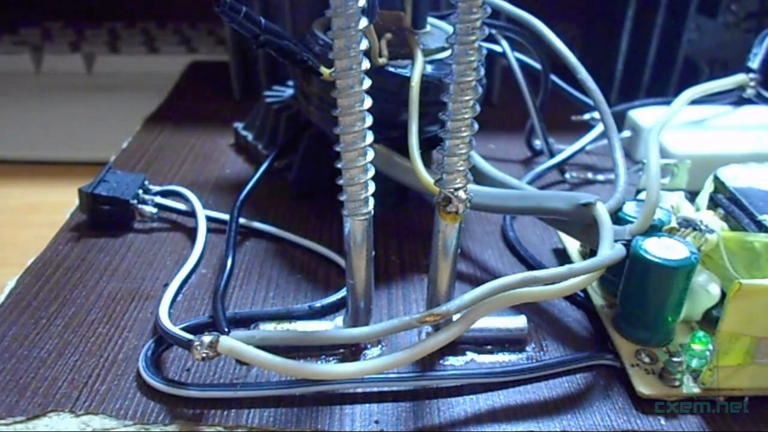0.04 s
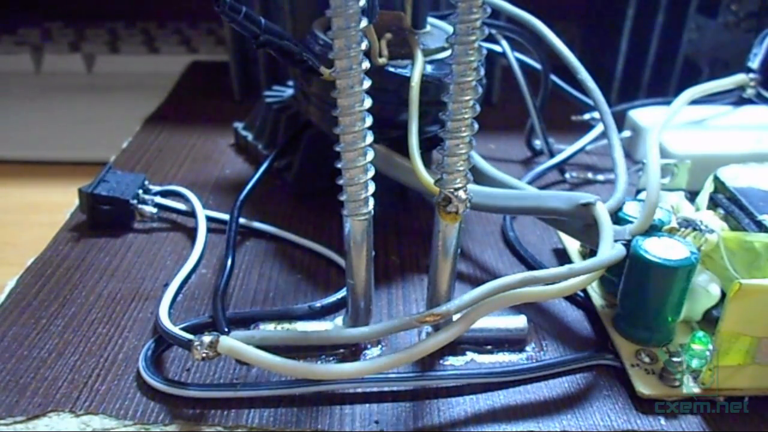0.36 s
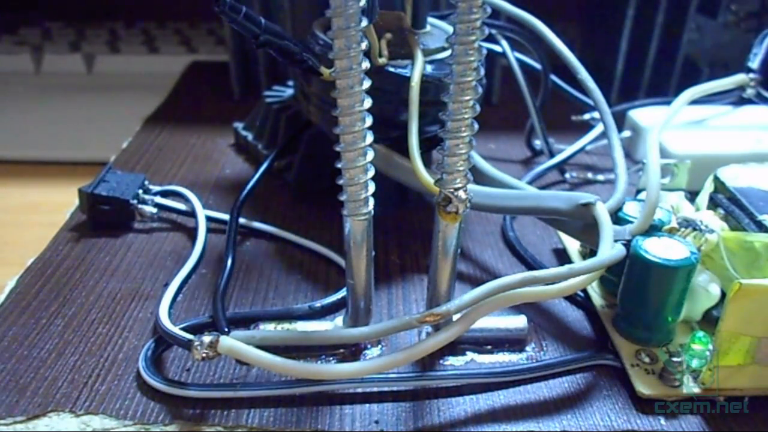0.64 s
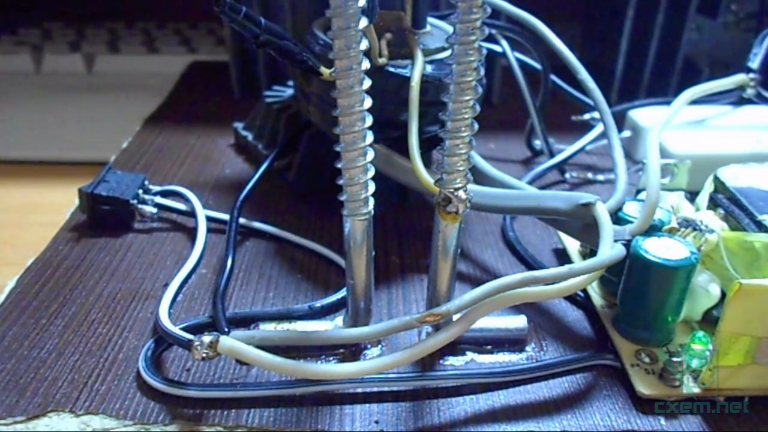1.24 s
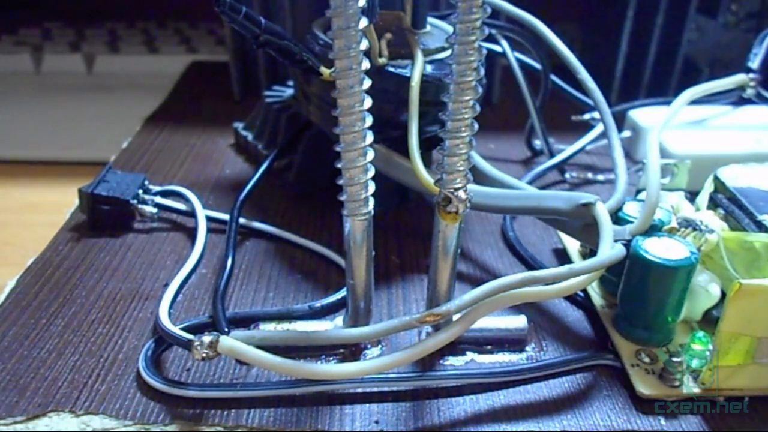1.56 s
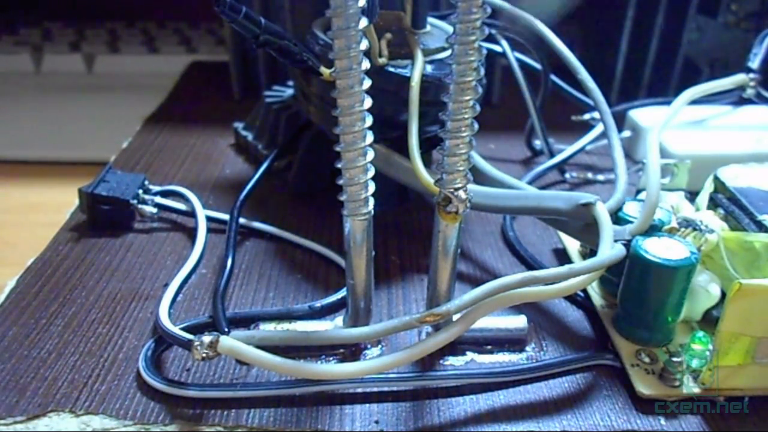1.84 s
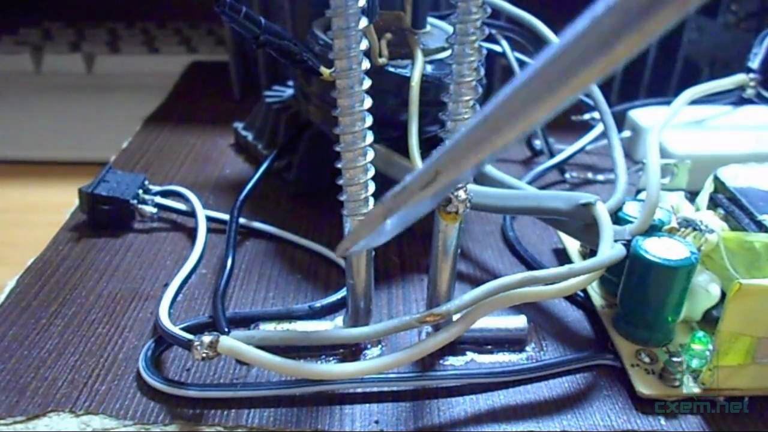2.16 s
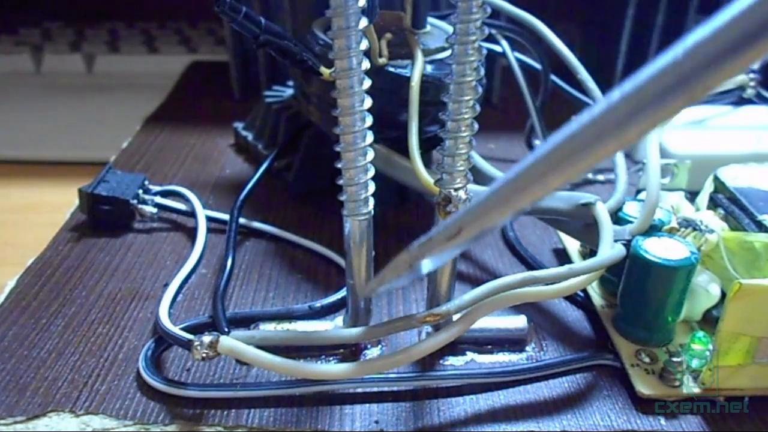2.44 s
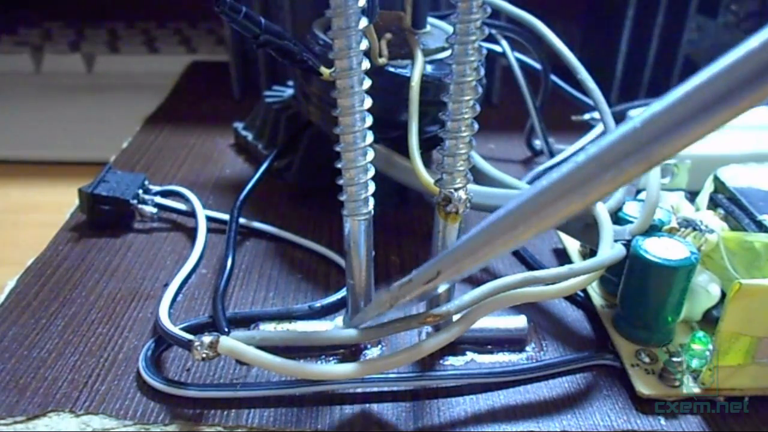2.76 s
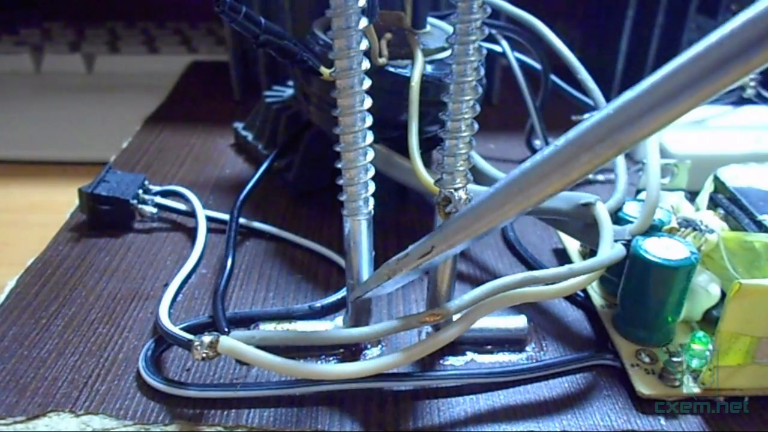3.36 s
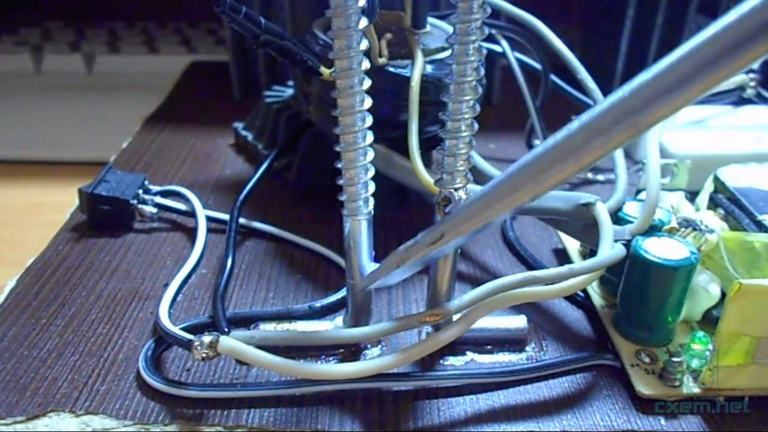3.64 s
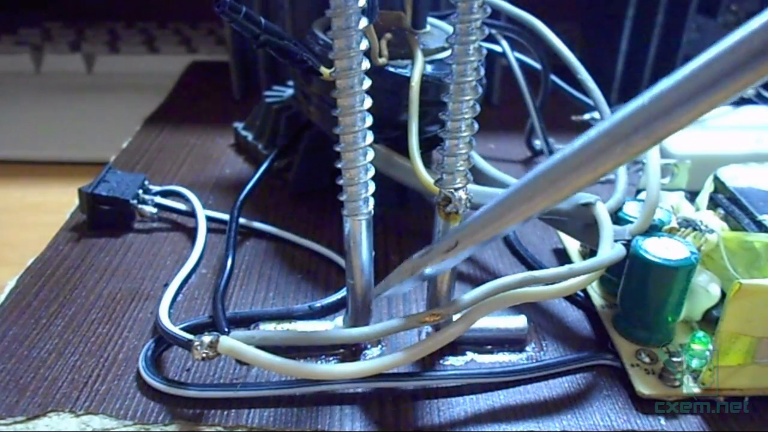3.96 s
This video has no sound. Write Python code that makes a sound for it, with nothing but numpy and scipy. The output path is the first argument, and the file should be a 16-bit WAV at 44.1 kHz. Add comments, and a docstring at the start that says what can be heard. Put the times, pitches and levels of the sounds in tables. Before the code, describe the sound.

A very high, unsteady electronic whine sounds close up in a small room, then cuts off. The rush and hum of fans grow louder behind it, dipping suddenly near the end under light metal clicks and dull table knocks.

```python
"""A homemade high-voltage circuit on a table whines near 10 kHz: one steady tone and a lower,
unstable oscillation that keeps slipping into chirps. At 0.73 s the whine stops with a tick and a tiny
squeak. The steady hiss and blade hum of cooling fans grow louder as the recorder's gain recovers, and
are ducked abruptly at 3.27 s. A screwdriver at the electrodes makes a few clicks, dull bumps excite
the modes of the table, and the gain on the fan noise partly comes back."""
import sys
import numpy as np
from scipy import signal
from scipy.fft import rfft, irfft
from scipy.io import wavfile

SR = 44100
rng = np.random.default_rng(int(sys.argv[2]) if len(sys.argv) > 2 else 0)


def int16_out(signal):
    """Quantize to a 16-bit WAV file."""
    q = np.round(np.clip(np.atleast_2d(signal).T, -1, 1) * 32767)
    wavfile.write(sys.argv[1], SR, q.astype(np.int16))


N = 176400
TIME = np.arange(N) / SR
CUTOFF_HZ = 11000


def from_db(db):
    """Amplitude ratio of a level in decibels."""
    return 10 ** (np.asarray(db) / 20)


def unit_rms(x):
    """Normalisation to a root mean square of 1."""
    return x / np.sqrt(np.mean(x ** 2) + 1e-20)


def curve(rows):
    """Linear interpolation of (time, value) points at every sample."""
    time_s, values = np.transpose(rows)
    return np.interp(TIME, time_s, values)


def drift(rate_hz):
    """Low-pass filtered noise: a random modulation of rms 1."""
    step, settle = 40, 2000  # audio samples per point; points dropped while the filter settles
    pole = np.exp(-2 * np.pi * rate_hz * step / SR)
    white = rng.standard_normal(N // step + settle + 2)
    slow = signal.lfilter([1], [1, -2 * pole, pole * pole], white)[settle:]
    return np.interp(np.arange(N) / step, np.arange(len(slow)), unit_rms(slow))


def noise(spectrum):
    """Spectral shaping: white noise takes on a colour, at rms 1."""
    hz, db = np.transpose(spectrum)
    bin_hz = np.maximum(np.arange(N // 2 + 1) * SR / N, 1)
    gain = from_db(np.interp(np.log(bin_hz), np.log(hz), db))
    return unit_rms(irfft(rfft(rng.standard_normal(N)) * gain, N))


def tone(hz):
    """Phase is the integral of frequency: a sine of rms 1 follows a pitch curve."""
    return np.sqrt(2) * np.sin(2 * np.pi * (np.cumsum(hz) / SR + rng.random()))


def resonate(x, hz, width_hz):
    """Forced response of a second-order resonator with a peak gain of 1."""
    radius = np.exp(-np.pi * width_hz / SR)
    feedback = [1, -2 * radius * np.cos(2 * np.pi * hz / SR), radius ** 2]
    return signal.lfilter(np.array([1, 0, -1]) * (1 - radius ** 2) / 2, feedback, x)


def ring(impulses, hz, t60_s):
    """Free vibration of a mode: each impulse starts a damped sine of its own height."""
    radius, angle = from_db(-60 / (t60_s * SR)), 2 * np.pi * hz / SR
    feedback = [1, -2 * radius * np.cos(angle), radius ** 2]
    return signal.lfilter([0, np.sin(angle)], feedback, impulses + 1e-18)


def gate(start_s, length_s, attack_s, release_s):
    """Envelope with a linear attack and, after length_s, an exponential decay."""
    age = TIME - start_s
    return np.clip(age / attack_s, 0, 1) * np.exp(-np.clip((age - length_s) / release_s, 0, 60))


def room(x, t60_s=0.32, gain_db=-18):
    """Reverberation: the diffuse field of a small room decays exponentially."""
    age = TIME[:SR // 2]
    tail = rng.standard_normal(len(age)) * from_db(-60 * age / t60_s)
    return from_db(gain_db) * signal.fftconvolve(x, tail / np.linalg.norm(tail))[:N]


# Spectrum of the rushing air: (frequency_hz, relative_density_db)
AIR_SPECTRUM = [(24, -15), (38, -10.5), (130, -11), (180, -4), (215, 0), (300, 0.5), (410, -5.5),
                (520, -1.5), (800, 0.5), (1020, -2), (1300, -9), (1700, -12), (2000, -16), (2700, -20.5),
                (3500, -22), (5000, -26.5), (6500, -30.5), (7900, -29), (9250, -18.5), (9700, -15),
                (10050, -10), (10400, -15.5), (10700, -25)]
# Harmonics of the blade-passing frequency: (harmonic_number, relative_level_db)
BLADE_HARMONICS = [(1, -34), (2, -34), (3, -42), (6, -53), (12, -60), (14, -58.5), (15, -59)]
# Tones of the other fans: (pitch_hz, relative_level_db, wander_hz)
FAN_TONES = [(306.7, -42, 3.5), (611, -38, 1.8), (771, -48.5, 5.05), (1051, -50, 4.1)]
# Envelope of one fan tone that swells and fades: (time_s, relative_level_db)
SWELL_ENVELOPE = [(0, -47), (.35, -32.5), (.65, -39.5), (1.3, -41.5), (1.8, -36), (2.1, -44.5),
                  (2.75, -43.5), (3, -35.5), (3.25, -42.5)]
# The recorder's gain on the steady fan noise, as a set curve: (time_s, gain_db)
RECORDER_GAIN = [(0, -15.5), (.72, -14.5), (.8, -16.5), (.83, -21.5), (.89, -21), (.93, -15), (1.0, -10.5),
                 (1.03, -14.5), (1.16, -8), (1.35, -3.5), (1.65, -1), (2.3, 0.5), (3.266, .5),
                 (3.268, -12.5), (3.305, -22), (3.37, -19.5), (3.57, -19.5), (3.67, -22.5), (3.7, -14),
                 (3.8, -11.5), (3.951, -5.5), (3.954, -17), (4, -11)]


def fans(blade_hz=274.45, swell_hz=348, flutter_db=1.42):
    """Aerodynamic sound: steady turbulent hiss and blade-passage hum, scaled by the recorder's gain."""
    sound = from_db(-31) * noise(AIR_SPECTRUM)
    blade_phase = 2 * np.pi * np.cumsum(blade_hz * (1 + 0.0006 * drift(2.04))) / SR
    for harmonic, db in BLADE_HARMONICS:
        sound += from_db(db + flutter_db * drift(6.2)) * np.sqrt(2) * np.sin(harmonic * blade_phase)
    for hz, db, wander_hz in FAN_TONES:
        sound += from_db(db + flutter_db * drift(10)) * tone(hz + wander_hz * drift(10.2))
    swell = from_db(curve(SWELL_ENVELOPE) + flutter_db * drift(3.6))
    sound += swell * tone(swell_hz + 2 * drift(11.8))
    return from_db(curve(RECORDER_GAIN)) * sound


# Dull bumps on the table: (start_s, level_db)
BUMPS = [(0.735, -45.5), (3.279, -31), (3.322, -32), (3.498, -39), (3.522, -28.5), (3.536, -32),
         (3.546, -28.5), (3.588, -30), (3.614, -26), (3.642, -32.5)]
# Modes of the table: (pitch_hz, gain_db, t60_s)
TABLE_MODES = [(136, -6, .04), (208, -1, 0.033), (540, -4.5, 0.012)]
# Envelope of the handling rumble: (time_s, level_db)
RUMBLE_ENVELOPE = [(.71, -69), (.74, -50), (.87, -67), (3.25, -57), (3.33, -43.5), (3.37, -56), (3.42, -62),
                   (3.485, -41), (3.56, -42.5), (3.65, -46), (3.7, -69)]
# Spectrum of that rumble: (frequency_hz, relative_density_db)
RUMBLE_SPECTRUM = [(20, -13), (55, -5.5), (200, -14), (400, -23), (1200, -52), (4000, -58)]


def handling():
    """Modal vibration: bumps excite the damped modes of the table, over a low rumble."""
    impulses = np.zeros(N)
    for start_s, db in BUMPS:
        impulses[int(start_s * SR)] = from_db(db)
    thuds = sum(from_db(db) * ring(impulses, hz, t60_s) for hz, db, t60_s in TABLE_MODES)
    return thuds + from_db(curve(RUMBLE_ENVELOPE)) * noise(RUMBLE_SPECTRUM)


# Faint metallic pings at two of the clicks: (start_s, pitch_hz, level_db)
PINGS = [(.732, 2340, -55), (3.32, 4400, -52)]


def pings(decay_s=0.016):
    """Damped vibration: each ping is a single sine that decays exponentially."""
    return sum(from_db(db) * gate(start_s, 0, decay_s / 10, decay_s) * tone(np.full(N, hz))
               for start_s, hz, db in PINGS)


# Ticks as the whine ends, then screwdriver contacts: (start_s, level_db, decay_s, bright_ring_gain_db)
CLICKS = [(0.732, -46, 0.0041, -2), (.916, -55.5, 0.0045, 7.5), (3.2786, -43, .00072, 11),
          (3.319, -42, 0.0054, -9), (3.506, -45, .0007, 4.5), (3.521, -46.5, .0009, 2),
          (3.5367, -50, .0009, 2), (3.565, -49, .0009, 6), (3.587, -51, .0012, 7), (3.611, -54, 0.0026, 11),
          (3.6425, -51.5, .001, 6), (3.691, -33.5, 0.00063, 6)]


def clicks():
    """Transient excitation: broadband cracks carry two resonances; the sliding tip adds friction noise."""
    middle_ring = unit_rms(resonate(rng.standard_normal(N), hz=3390, width_hz=300))
    lowpass = signal.butter(2, CUTOFF_HZ, fs=SR, output="sos")
    crack = unit_rms(signal.sosfilt(lowpass, rng.standard_normal(N))) + from_db(-15.5) * middle_ring
    bright_ring = unit_rms(resonate(rng.standard_normal(N), hz=9900, width_hz=490))
    roughness = from_db(-65 + 9 * np.tanh(drift(150)))
    scratch = roughness * gate(start_s=3.48, length_s=0.2, attack_s=0.014, release_s=0.014) * crack
    # The snap that ends the whine drives the middle resonance hard.
    snap_s, _, snap_decay_s, _ = CLICKS[0]
    snap = from_db(-41) * gate(snap_s, snap_decay_s / 2, snap_decay_s / 10, snap_decay_s) * middle_ring
    sound = scratch + snap
    for start_s, db, decay_s, bright_db in CLICKS:
        envelope = from_db(db) * gate(start_s, decay_s / 2, decay_s / 10, decay_s)
        sound += envelope * (crack + from_db(bright_db) * bright_ring)
    return sound


# Squeaks after the whine: (start_s, length_s, pitch_hz, level_db)
SQUEAKS = [(0.802, .014, 7760, -37.5), (0.834, 0.0037, 7600, -47)]


def squeaks(jitter_hz=40):
    """Transient oscillation: two last short tone bursts die away."""
    sound = np.zeros(N)
    for start_s, length_s, hz, db in SQUEAKS:
        envelope = from_db(db) * gate(start_s, length_s, attack_s=0.002, release_s=0.0051)
        sound += envelope * tone(hz + jitter_hz * drift(100))
    return sound


# Hard slips of the lower tone: (start_s, relative_level_db)
HARD_SLIPS = [(.017, -1), (0.055, -2), (.111, -1), (.126, 4), (.15, -1), (.27, 4), (.362, -4), (.374, 2),
              (.39, 4), (.52, -6), (0.647, -7), (.696, -5), (.722, -6)]


def slipping_tone(pitch_hz=9798, jitter_hz=30, small_slips_per_s=70):
    """Unstable oscillation: at each slip the tone dips and breaks into a falling chirp with a crackle."""
    slips = (rng.random(N) < small_slips_per_s / SR) * from_db(-9 + 2 * rng.standard_normal(N))
    for start_s, db in HARD_SLIPS:
        slips[int(start_s * SR)] = from_db(db)
    chirp_hz, fall_hz, slip_s = 9800, 340, 0.0018  # the pitch falls by fall_hz in each slip_s
    age = np.arange(-SR // 50, SR // 50) / SR / slip_s  # in units of slip_s
    window = np.exp(-age ** 2)
    chirp = window * np.exp(2j * np.pi * slip_s * (chirp_hz * age - fall_hz * age ** 2 / 2))
    random_phases = np.exp(2j * np.pi * rng.random(N))
    chirps = signal.fftconvolve(slips * random_phases, chirp, "same").real
    dips = signal.fftconvolve(slips, np.exp(-(age / 2 - 0.5) ** 2), "same")
    held_tone = from_db(-6) * np.clip(1 - dips, 0, 1) * tone(pitch_hz + jitter_hz * drift(51))
    white = rng.standard_normal(N)
    crackle = unit_rms(resonate(white, hz=8700, width_hz=800) + resonate(white, hz=6700, width_hz=330))
    crackle *= from_db(-19) * signal.fftconvolve(slips, window ** 2, "same")
    return held_tone + chirps + crackle


# Side tones, with levels against the main tone: (pitch_hz, relative_level_db)
SIDE_TONES = [(10194, -14.5), (9497, -25), (6715, -42), (5740, -33)]
# Thin whistles that come and go: (start_s, length_s, pitch_hz, relative_level_db)
WHISTLES = [(0, 0.34, 3458, -35), (0, .37, 4395, -35), (0, 0.4, 5120, -31), (0.477, 0.23, 5097, -29)]


def steady_tones(pitch_hz=10443, jitter_hz=8.5, flutter_db=0.1):
    """Sustained oscillation: the main tone, side tones and whistles waver in pitch and level."""
    sound = tone(pitch_hz + jitter_hz * drift(60)) * from_db(-flutter_db * drift(50))
    for hz, db in SIDE_TONES:
        sound += from_db(db + 3.5 * drift(23)) * tone(hz + 16 * drift(41))
    for start_s, length_s, hz, db in WHISTLES:
        envelope = gate(start_s, length_s, attack_s=0.04, release_s=0.04)
        sound += envelope * from_db(db - flutter_db * drift(18)) * tone(hz + jitter_hz * drift(23))
    return sound


# Spectrum of the sizzle around the whine: (frequency_hz, relative_density_db)
SIZZLE_SPECTRUM = [(3000, -45.5), (4600, -31.5), (5300, -29), (6000, -35), (7800, -45), (9000, -29),
                   (9550, -17), (9900, -11), (10130, -10), (10350, -6), (10750, -25)]
# Envelope of the whole whine: (time_s, gain_db)
WHINE_ENVELOPE = [(0, -28), (.15, -28), (.195, -29), (.22, -27.5), (.25, -30.5), (.28, -28), (.4, -28),
                  (.45, -31.5), (.51, -27)]


def whine(stop_s=0.727, release_s=0.008):
    """Amplitude modulation: the circuit's tones and sizzle share one envelope, which ends in a fast decay."""
    release = np.exp(-np.clip((TIME - stop_s) / release_s, 0, 60))
    sound = steady_tones() + slipping_tone() + from_db(-10.5) * noise(SIZZLE_SPECTRUM)
    return from_db(curve(WHINE_ENVELOPE)) * release * sound


def scene():
    """Superposition: circuit and screwdriver close by in a small room, fans behind, a faint even hiss."""
    near = whine() + squeaks() + clicks() + pings()
    mix = near + room(near) + fans() + handling()
    hiss = from_db(-62.5) * rng.standard_normal(N)
    return (mix + hiss)[None]


def record(dry, lag_samples=4):
    """Comb filtering: two offset pickups sum to mono and cancel at 5.5 kHz; a low-pass cuts the top."""
    delayed = np.pad(dry, ((0, 0), (lag_samples, 0)))[:, :N]
    lowpass = signal.ellip(12, 0.2, 80, CUTOFF_HZ - 100, fs=SR, output="sos")
    return signal.sosfilt(lowpass, (dry + delayed) / 2)


dry = scene()
out = record(dry)
int16_out(out)
```